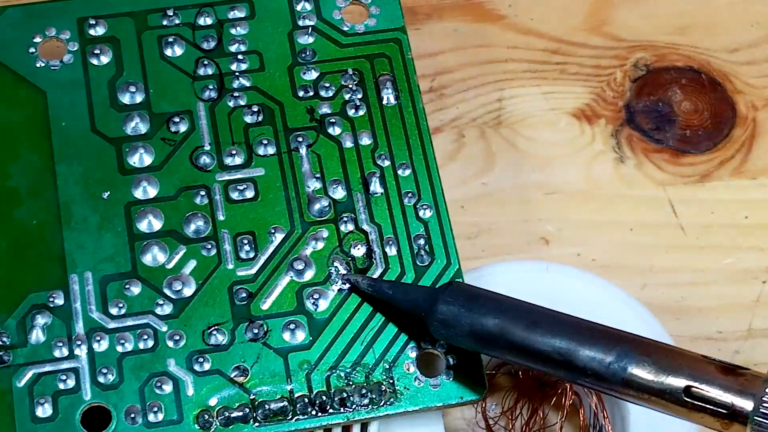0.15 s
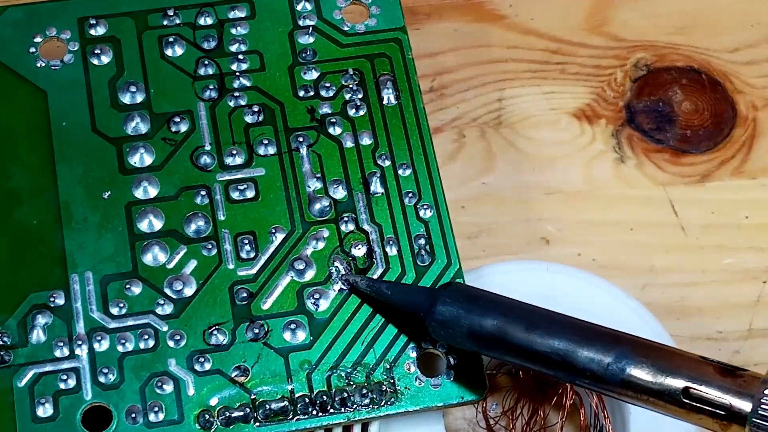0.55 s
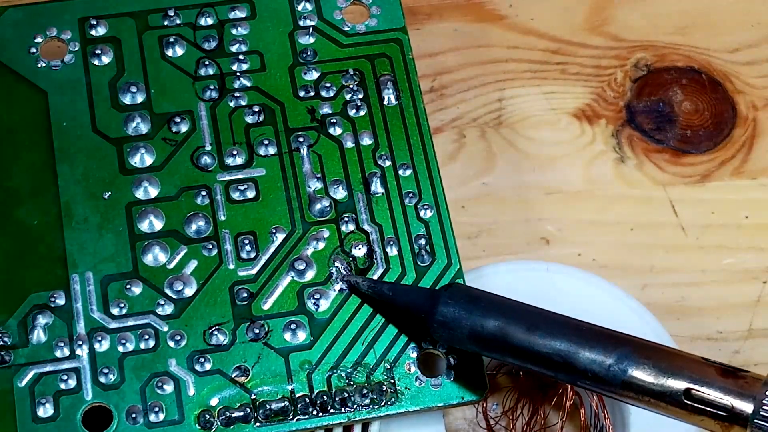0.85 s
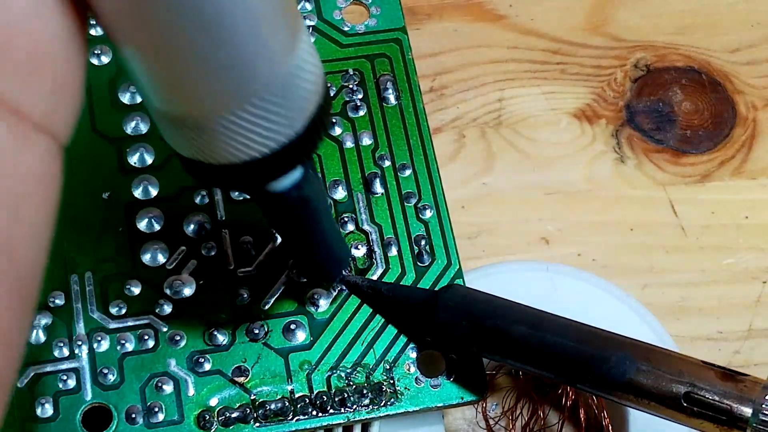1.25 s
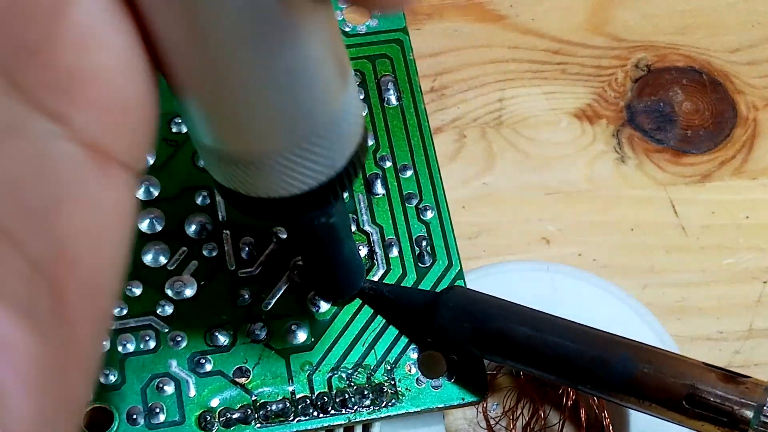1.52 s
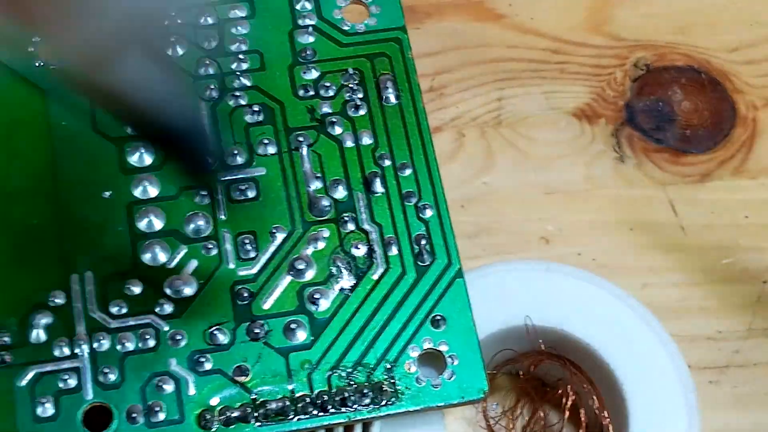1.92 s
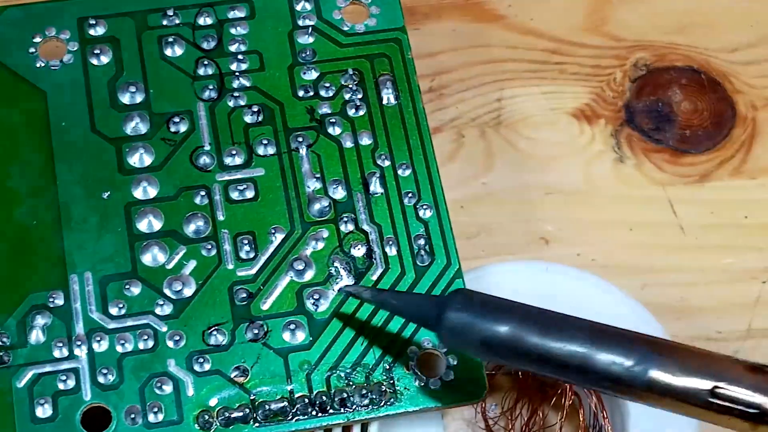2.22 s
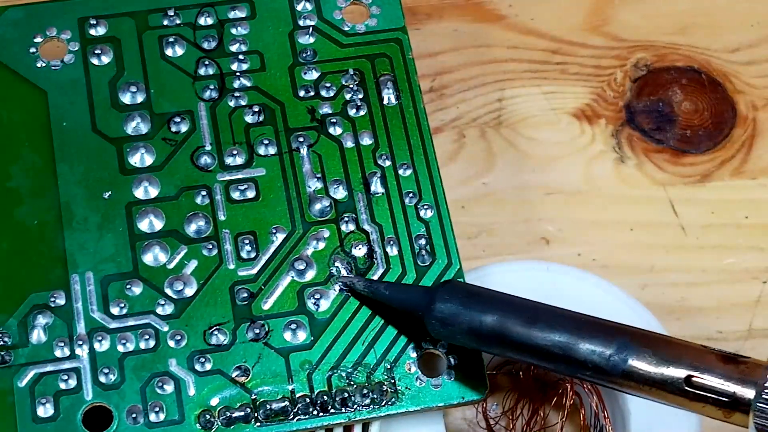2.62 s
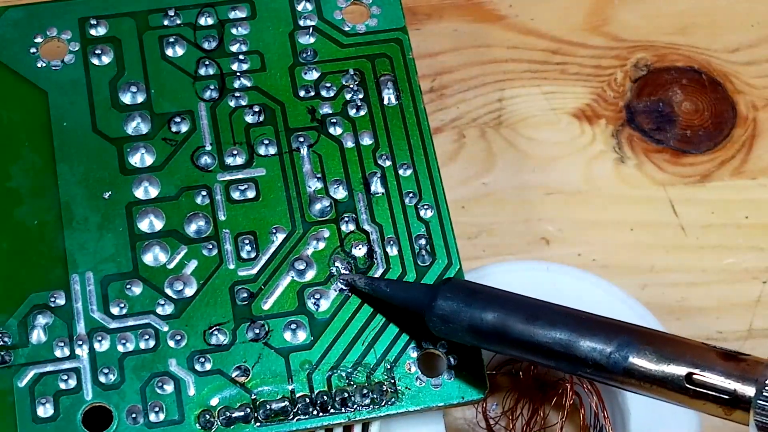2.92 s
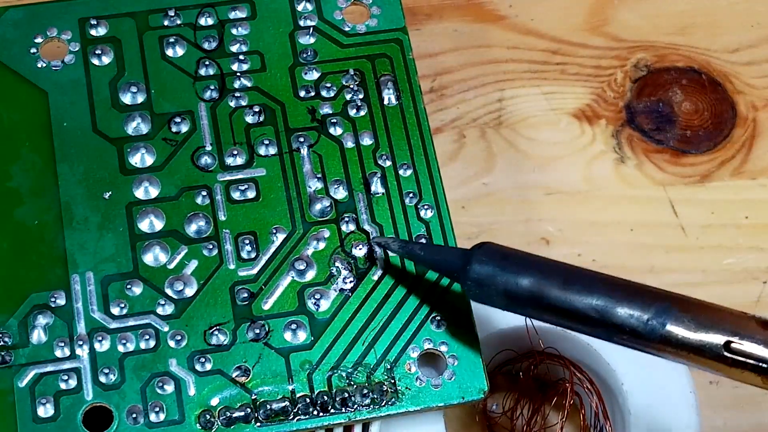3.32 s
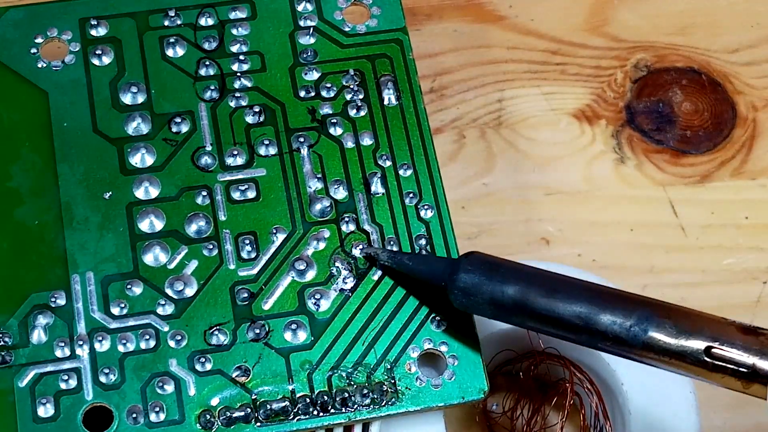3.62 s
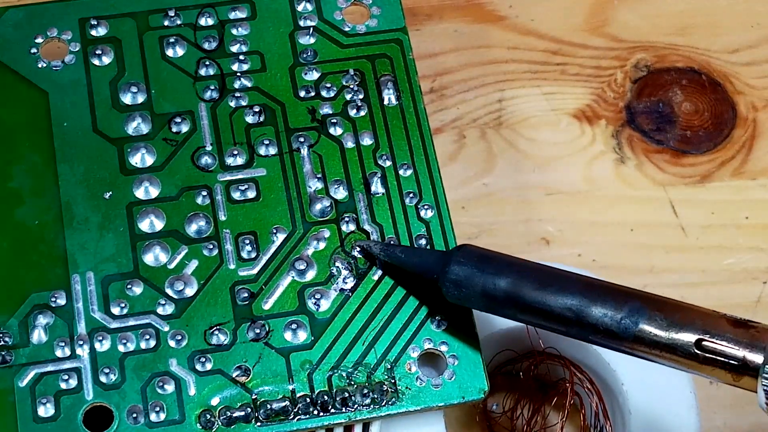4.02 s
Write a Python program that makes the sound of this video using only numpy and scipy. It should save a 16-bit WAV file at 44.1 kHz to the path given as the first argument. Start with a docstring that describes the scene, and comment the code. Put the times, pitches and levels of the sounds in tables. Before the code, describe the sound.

Close microphone in a small room, with a steady, very quiet, low fan hum. A small spring pump is pushed down with tiny snags and snaps into its catch. Hands rustle faintly; nozzle and iron tick against a circuit board, then a very sharp two-part snap rings and rattles away. The plunger is pressed back to another crisp click, followed by near quiet and one tiny board tap close to the end.

```python
"""A plunger slides and clicks into its catch, a sharp double crack rings out, then it is cocked again.
This is a spring-loaded desoldering pump at a workbench, fired on a circuit board in a small room.
Rubbing is uneven noise, clicks and cracks are short bursts of noise shaped by each part's tone,
and the spring rings as a set of dying sines. Nozzle and iron tap the board, hands rustle the tools,
and a fan hums faintly throughout: a few wavering sines over soft noise."""
import sys
import numpy as np
from scipy import signal
from scipy.fft import rfft, irfft, next_fast_len
from scipy.io import wavfile

SR = 44100
rng = np.random.default_rng(int(sys.argv[2]) if len(sys.argv) > 2 else 0)


def int16_out(signal):
    """Quantize to a 16-bit WAV file."""
    q = np.round(np.clip(np.atleast_2d(signal).T, -1, 1) * 32767)
    wavfile.write(sys.argv[1], SR, q.astype(np.int16))


N = 183279
T = np.arange(int(.7 * SR)) / SR  # time axis of one short sound, in s


def firing():
    """The catch lets go and the piston hits its stop: two cracks with a rush between; the parts ring on."""
    # trigger letting go, then piston hitting its stop: t/s, crack/dB, crack length/s, crack t60/s,
    # barrel ring/dB (before a 6.5 dB cut), push/dB, push width/s
    snaps = [(1.6948, -18, 0.0013, 0.0092, -23, -28.5, 0.00016),
             (1.7085, -26.5, 0.002, 0.016, -17.5, -18.5, 0.00012)]
    # tone of the crack: f/Hz, level/dB
    crack_colour = [(35, -19), (150, 0), (240, 0.5), (420, -12.5), (1100, 0), (1600, -6.5), (2200, -3.5),
                    (3150, -4), (3680, -17), (4400, 3.5), (5400, -6.5), (7500, 2), (14500, -7),
                    (16000, -11.5)]
    # resonances of the barrel: f/Hz, width/Hz, level/dB
    barrel = [(3020, 220, -7), (3410, 110, -13), (8040, 170.9, -6.5), (10250, 570, 4.5), (13630, 150, 5)]
    # board against the bench: f/Hz, level/dB relative to the push, t60/s
    thump = [(118, -22.5, 0.029), (240.5, -15.5, 0.029), (1230, -8, 0.0071)]
    # tone of the air sucked in: f/Hz, level/dB
    rush_colour = [(200, -7), (420, -13), (750, -8.5), (2000, -17.5), (4400, -3), (7000, -2.5),
                   (10200, 6.5), (12000, -5), (13700, 1), (16000, -12.5)]
    # tones of the freed spring: f/Hz, relative level/dB, t60/s
    spring = [(184, -2, 0.49), (252, -7, 0.15), (2876, -3, 0.3), (2950, -0.5, 0.29), (3111, -3, 0.1),
              (3080, -4, .25), (3370, -3.5, .24), (4590, -7, 0.22), (6700, -7, 0.21), (7200, -5.5, 0.18),
              (8640, -4, .2), (9726, -5, .2), (10030, -5.5, 0.22), (10100, -0.5, .24), (10375, 2, 0.18),
              (10470, 0.5, 0.33), (10900, -1.5, 0.23), (11000, -5.5, .24), (13700, -0.5, 0.22),
              (13300, -1.5, .19), (13590, 1, 0.21)]
    # tone of the rattling coils: f/Hz, level/dB
    coil_colour = [(50, -23.5), (200, -5), (850, -21.5), (1600, -16), (2700, -1), (3400, -1.5),
                   (3700, -21.5), (4100, -0.5), (6000, -6.5), (7500, -2), (12000, -5), (16000, -13)]

    out = np.zeros(N)
    for s, crack_db, length, t60, ring_db, push_db, width in snaps:
        crack = colour(chatter(length, t60), crack_colour)
        add(out, s, amp(crack_db) * crack)
        shake = chatter(length=0.0021, t60=0.014, rise=0.00089)
        add(out, s, amp(ring_db - 6.5) * body(shake, barrel))
        # the recoil pushes on the board, which thumps on the bench
        u = T / width
        push = u * (2 - u) * np.exp(1 - u)
        add(out, s, amp(push_db) * (push + ring(thump)))

    release, stop = snaps[0][0], snaps[1][0]
    flight = [(release + 0.0046, -41), (stop - .003, -30), (stop + 0.002, -33)]  # t/s, level/dB
    out += colour(rub(flight, grain_db=1.0, fade=0.0009), rush_colour)
    spring_swell = 1 - np.exp(-T / 0.0161)
    add(out, stop, amp(-40) * ring(spring) * spring_swell)
    # loose coils rattle unevenly inside the barrel
    unevenness = amp(2 * drift(rate_hz=300)[:len(T)])
    coils = chatter(length=.037, t60=0.24, rise=0.021) * unevenness
    add(out, stop, amp(-45) * body(coils, barrel) + amp(-39.5) * colour(coils, coil_colour))
    return out


def cocking():
    """The plunger rubs down the barrel, clicks past the catch and settles back on it."""
    # strokes from first push to latch: start t/s, latch t/s, rubbing/dB (before the slide is mixed),
    # latch/dB, latch t60/s, latch brightness/dB per octave
    strokes = [(0.145, .3132, -65.5, -22.5, 0.011, 0.5), (2.313, 2.5119, -68, -26, 0.011, 0.5)]
    # plunger snagging on the catch on its way down: t/s, level/dB, brightness/dB per octave, pitch factor
    catches = [(0.1486, -60.5, -1, 1.23), (.160, -57, -4.5, 1.01), (0.215, -51.5, -7.5, .89),
               (0.2763, -48.5, 2.5, 1.43), (.287, -54, -8, .92), (2.298, -66, 11, 0.77),
               (2.3246, -49, -5.5, 1.194)]
    # plunger settling on the catch as the thumb lets go: t/s, click/dB, knock delay/s, knock/dB
    seats = [(.406, -40.5, 0.0029, -43.5), (2.6009, -40, .0045, -46)]
    # resonances of the plunger: f/Hz, width/Hz, level/dB
    plunger = [(292, 290, -7.5), (917, 155, 2), (1014, 50, -16), (2270, 230, -40)]
    # tone of the rubbing: f/Hz, level/dB
    slide_colour = [(1500, -23), (2500, -14), (3400, -7), (4400, -5), (5400, -8.5), (6400, -1.5),
                    (8000, -1.5), (10000, -1.5), (13000, -6), (16000, -9.5)]
    # the squeezed spring sings faintly: f/Hz, width/Hz, level/dB relative to the rubbing
    coil_song = [(3480, 220, -22), (4360, 260, -15), (6300, 200, -17)]
    push_s = 0.012  # s, the thumb takes up the load
    ease_s, ease_db = 0.036, -2.5  # s, dB: the thumb slows the plunger just before the latch

    clicks, knocks, slide = np.zeros((3, N))
    for start, latch, rub_db, latch_db, t60, slope_db in strokes:
        stroke = [(start, rub_db), (latch - ease_s, rub_db), (latch, rub_db + ease_db)]
        slide += rub(stroke, grain_db=1.0, fade=push_s)
        add(clicks, latch, amp(latch_db) * click(0.0035, t60, slope_db, pitch=1.005))
    for s, db, slope_db, pitch in catches:
        add(clicks, s, amp(db) * click(0.0011, 0.015, slope_db, pitch))
    for s, click_db, delay, knock_db in seats:
        add(clicks, s, amp(click_db) * click(0.005, 0.015, slope_db=2, pitch=1.03))
        knock = body(chatter(length=0.00035, t60=0.013, rise=0.00045), plunger)
        add(knocks, s + delay, amp(knock_db) * knock)

    slide = colour(slide, slide_colour)
    slide = amp(-3.0) * slide + body(slide, coil_song)
    # held in the air, the small pump radiates little bass
    bass_cut = signal.butter(2, 110, "high", fs=SR)
    return signal.lfilter(*bass_cut, clicks + knocks + slide)


def click(length, t60, slope_db, pitch):
    """The catch buzzes against the plunger: length and t60 in s, brightness in dB per octave."""
    # tone of the catch: f/Hz, level/dB
    catch_colour = [(150, -30), (500, -34), (1200, -31.5), (2200, -35), (2900, -28.5), (3650, -16),
                    (4300, 0.5), (5100, -2.5), (5700, -9), (6200, -8), (7800, -13), (9600, -10),
                    (13000, -12.5), (16000, -21)]
    return colour(chatter(length, t60, rise=0.00047), tilted(catch_colour, slope_db, pitch))


def touches():
    """Nozzle and iron tick on the circuit board and make it ring; the nozzle also drags on the joint."""
    # nozzle and iron touching: t/s, tick/dB, tick t60/s, board ring/dB, brightness/dB per octave
    contacts = [(1.6096, -44, 0.019, -66.5, -1), (1.6748, -54, .01, -77, 0.5),
                (3.9307, -68.5, 0.016, -54, 3)]
    # tone of ticks and dragging: f/Hz, level/dB
    touch_colour = [(200, -8.5), (450, -15), (660, 3), (1100, -5.5), (1900, -3.5), (2350, 1), (2900, -7),
                    (4200, -1), (5200, -15.5), (8200, -4), (11000, -13), (16000, -23)]
    # resonances of the circuit board: f/Hz, width/Hz, level/dB
    board_modes = [(220, 34, 2.5), (245, 30, -6), (1223, 42, -1), (1860, 250, -12), (2840, 110, -7.5),
                   (3334, 310, -5.5), (3990, 200, -10), (6750, 810, -4.5), (9684, 770, -5)]
    start, end, drag_db = 1.537, 1.694, -62.5  # s, s, dB before the drag is mixed
    press_s, press_db = 0.098, -19.5  # s, dB: the nozzle starts softer and is pressed home gradually

    pressing = [(start, drag_db + press_db), (start + press_s, drag_db), (end, drag_db)]
    drag = rub(pressing, grain_db=2.5)
    squeak = body(drag, [(2323, 72, -10.0), (4130, 100, -7)])  # f/Hz, width/Hz, level/dB
    out = amp(-2.0) * colour(drag, touch_colour) + squeak
    for s, tick_db, t60, ring_db, slope_db in contacts:
        contact = chatter(length=0.00072, t60=t60)
        tick = colour(contact, tilted(touch_colour, slope_db))
        add(out, s, amp(tick_db) * tick + amp(ring_db) * body(contact, board_modes))
    return out


def hands():
    """Skin slips on the tools: a faint, uneven rustle of the grip, which swells when the hands shift."""
    # hands shifting tools and board: middle t/s, length/s, level/dB (before a 0.5 dB cut), pitch factor
    shifts = [(0.134, 0.067, -66.5, 1.08), (0.252, 0.088, -73.5, 0.82), (0.445, 0.12, -69, 1.04),
              (0.792, 0.22, -68, 0.98), (1.578, .14, -69, 1), (2.029, .16, -69.5, 1),
              (2.351, 0.22, -68, 0.59), (3.623, .36, -71, 1.05)]
    # tone of the rustle: f/Hz, level/dB
    handling_colour = [(60, -24), (130, -6), (200, 0.5), (290, -6), (370, 4.5), (480, -5.5), (650, -11.5),
                       (1000, -18), (2000, -32.5), (8000, -37.5)]

    grip = amp(-81 + 5 * drift(rate_hz=4.1))
    out = colour(slips(grain_db=2.5) * grip, handling_colour)
    for s, length, db, pitch in shifts:
        swell = np.sin(np.pi * np.minimum(T / length, 1))
        rustle = colour(swell * slips(grain_db=3.5)[:len(T)], tilted(handling_colour, 0, pitch))
        add(out, max(s - length / 2, 0), amp(db - 0.5) * rustle)
    return out


def fan():
    """Wavering motor lines, the lowest one throbbing, over a soft rush of air."""
    # motor lines: f/Hz, level/dB rms before waver and throb
    motor_lines = [(73.6, -79), (147.3, -70.5), (220.9, -76.5), (294.5, -90.5), (389, -87), (747, -91),
                   (1104, -94.5), (1470, -88.5), (1766, -101)]
    # tone of the air: f/Hz, level/dB
    air_colour = [(25, -22), (70, -15), (120, -5.5), (190, 6.5), (280, -1.5), (390, -6), (550, -5.5),
                  (1000, -10.5), (1250, -20), (1550, -16.5), (2100, -20.5), (4200, -24), (10500, -21),
                  (13000, -35.5)]
    # narrow bands of hiss: f/Hz, width/Hz, level/dB rms
    hiss_bands = [(1500, 170, -92.5), (5560, 340, -92.5), (9950, 360, -91.5)]
    throb_period, throb_crest, throb_db = .349, .11, 4.5  # s, first crest in s, dB up and down

    lines = []
    for hz, db in motor_lines:
        level = amp(db + 1.2 * drift(rate_hz=0.64))
        wavering_hz = hz * (1 + 0.002 * drift(rate_hz=9.5))
        phase = 2 * np.pi * np.cumsum(wavering_hz) / SR
        lines.append(level * np.sqrt(2) * np.sin(phase))
    t = np.arange(N) / SR
    throb = amp(throb_db * np.cos(2 * np.pi * (t - throb_crest) / throb_period) - 5.0)
    rush = colour(rng.standard_normal(N), air_colour) * amp(-76.5 + 0.21 * drift(rate_hz=5.9))
    hiss = sum(amp(db) * resonate(rng.standard_normal(N), hz, width) for hz, width, db in hiss_bands)
    return throb * lines[0] + sum(lines[1:]) + rush + hiss


def room(x, build=0.0054):
    """A diffuse tail of noise that builds up as the walls answer and dies band by band."""
    # how long each band lasts: f/Hz, t60/s
    room_t60 = [(150, 0.87), (500, 0.22), (1500, .26), (4300, 0.3), (8000, 0.28), (15000, 0.2)]
    # tone of the tail: f/Hz, level/dB
    room_colour = [(100, -7), (200, -3), (450, -4.5), (900, -5.5), (1800, -5.5), (3000, -5.5), (5000, -9.5),
                   (9000, -6.5), (15000, -9)]

    hz, t, bands = signal.stft(rng.standard_normal(len(T)), SR, nperseg=256)
    t60 = read(room_t60, hz)[:, None]
    bands *= amp(read(room_colour, hz)[:, None] - 60 * t / t60)
    bands *= np.sqrt(np.log(1e6) / (t60 * SR))  # evens out the energy of long and short tails
    tail = signal.istft(bands, SR, nperseg=256)[1][:len(T)]
    tail = tail * (1 - np.exp(-(T / build) ** 2))
    return signal.fftconvolve(x, tail)[:N]


def chatter(length, t60, rise=0.00013):
    """Parts buzz against each other for a moment, then come to rest (times in s)."""
    onset = 1 - np.exp(-T / rise)
    decay = amp(-60 * np.maximum(T - length, 0) / t60)
    return onset * decay * rng.choice([-1., 1.], len(T))


def ring(modes):
    """Dying sines of a struck part."""
    return sum(amp(db - 60 * T / t60) * np.sin(2 * np.pi * hz * T) for hz, db, t60 in modes)


def body(x, resonances):
    """A part with several resonances, shaken by x."""
    return sum(amp(db) * resonate(x, hz, width_hz) for hz, width_hz, db in resonances)


def resonate(x, hz, width_hz):
    """One resonance, which favours sound near its own pitch; keeps the energy."""
    pole = np.exp((2j * hz - width_hz) * np.pi / SR)
    y = signal.lfilter([1], [1, -pole], x).real
    return unit(y) * np.sqrt(np.mean(x ** 2))


def rub(curve, grain_db, fade=0.032):
    """Friction that follows a level curve of (time in s, level in dB)."""
    s, db = np.transpose(curve)
    level = amp(np.interp(np.arange(N) / SR, s, db))
    return between(s[0], s[-1], fade) * level * slips(grain_db)


def slips(grain_db):
    """Friction: tiny slips of uneven size."""
    return unit(rng.standard_normal(N) * amp(grain_db * drift(rate_hz=420)))


def drift(rate_hz):
    """Smooth random wander of rms one, with less and less movement above rate_hz."""
    spectrum = rfft(rng.standard_normal(N))
    keep_low = np.exp(-(np.fft.rfftfreq(N, 1 / SR) / rate_hz) ** 2)
    return unit(irfft(spectrum * keep_low, N))


def between(start, end, fade):
    """One from start to end, with short ramps inside (times in s)."""
    t = np.arange(N) / SR
    return np.clip(np.minimum(t - start, end - t) / fade, 0, 1)


def colour(x, points):
    """Gives x the spectrum in the table, without sounding ahead of x; keeps the energy."""
    size = next_fast_len(len(x) + 4096)
    log_gain = np.log(amp(read(points, abs(np.fft.fftfreq(size, 1 / SR)))))
    response = np.exp(np.conj(signal.hilbert(log_gain)))  # minimum phase
    y = np.fft.ifft(np.fft.fft(x, size) * response).real[:len(x)]
    return unit(y) * np.sqrt(np.mean(x ** 2))


def tilted(points, slope_db, pitch=1):
    """The same spectrum, shifted in pitch, and brighter or duller per octave above 2000 Hz."""
    return [(hz * pitch, db + slope_db * np.log2(max(hz, 2000) / 2000)) for hz, db in points]


def read(points, hz):
    """Reads a spectrum table on a log-frequency axis."""
    f, value = np.transpose(points)
    return np.interp(np.log(hz + 1), np.log(f + 1), value)


def amp(db):
    """Decibels to gain."""
    return 10 ** (np.asarray(db) / 20)


def unit(x):
    """Scales to an rms of one."""
    return x / np.sqrt(np.mean(x ** 2) + 1e-20)


def add(mix, s, sound):
    """Mixes a sound in at time s, in seconds."""
    part = mix[round(s * SR):][:len(sound)]
    part += sound[:len(part)]


def scene():
    """Pump and iron close by, the room behind them, the fan throughout."""
    shot, pump, board = firing(), cocking(), touches()
    # the thump of the shot hardly carries into the room
    carried = signal.lfilter(*signal.butter(1, 1800, "high", fs=SR), shot)
    walls = room(amp(1.5) * pump + amp(-3.5) * carried + amp(0.5) * board)
    return (pump + shot + board + walls + hands() + fan())[None]


def record(dry):
    """The recorder's band limit: a steep low-pass near 16 kHz."""
    low_pass = signal.firwin(255, 15950, window=("kaiser", 9), fs=SR)
    return signal.oaconvolve(dry, low_pass[None], "same")


dry = scene()
out = record(dry)
int16_out(out)
```